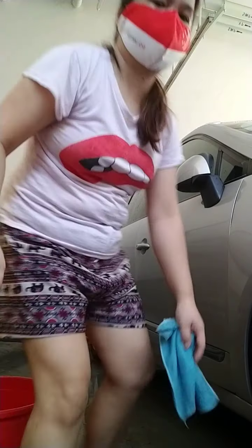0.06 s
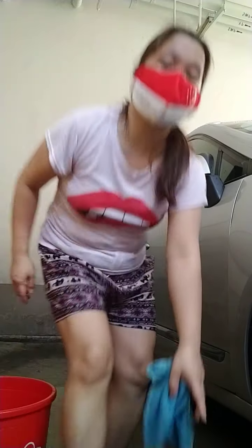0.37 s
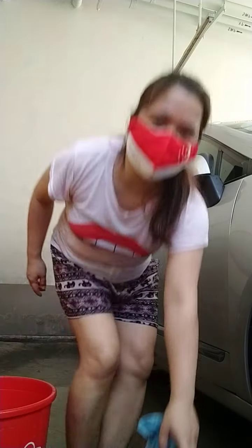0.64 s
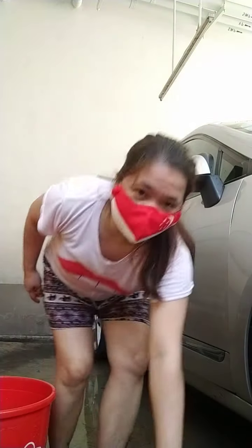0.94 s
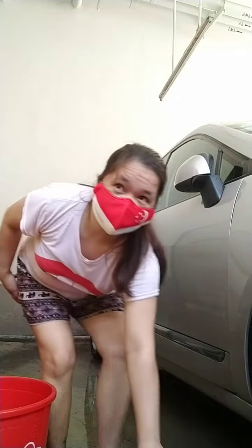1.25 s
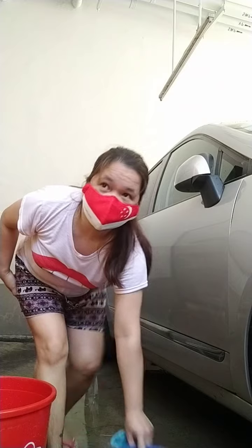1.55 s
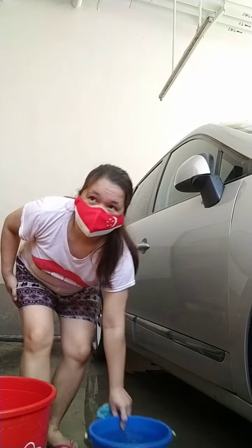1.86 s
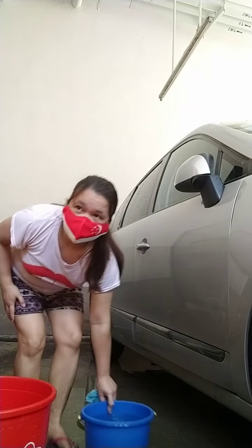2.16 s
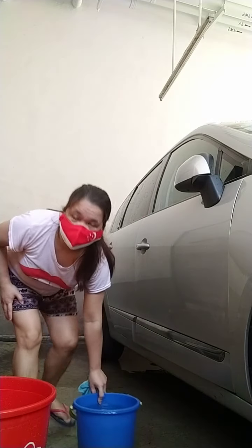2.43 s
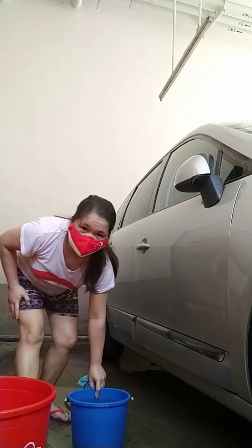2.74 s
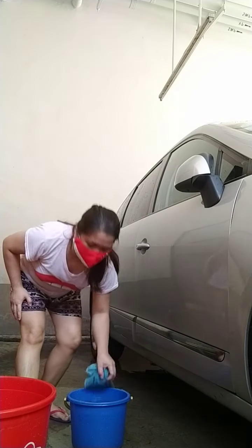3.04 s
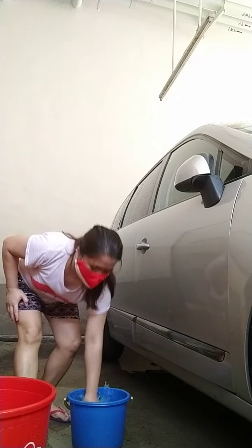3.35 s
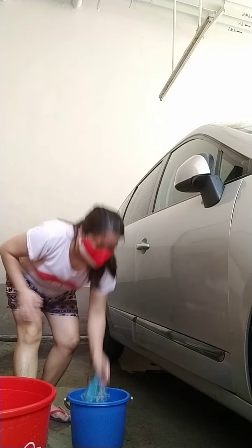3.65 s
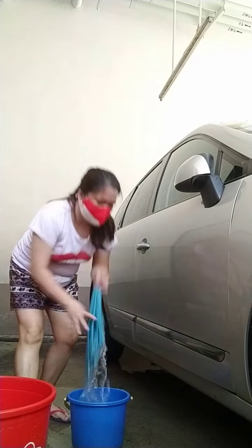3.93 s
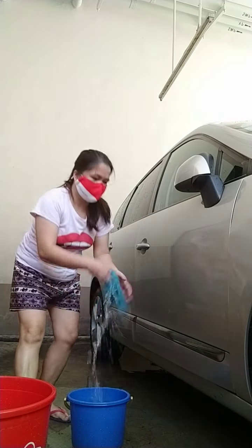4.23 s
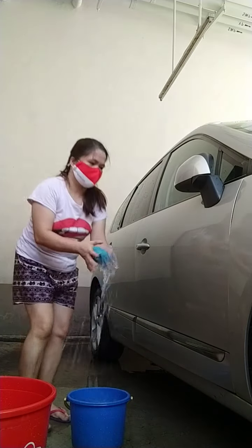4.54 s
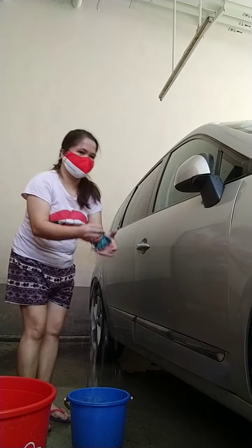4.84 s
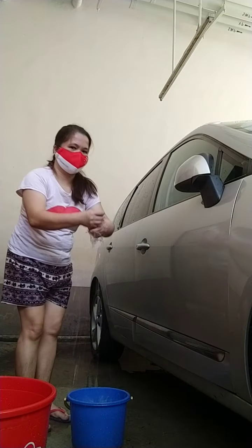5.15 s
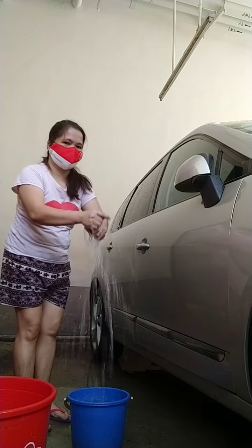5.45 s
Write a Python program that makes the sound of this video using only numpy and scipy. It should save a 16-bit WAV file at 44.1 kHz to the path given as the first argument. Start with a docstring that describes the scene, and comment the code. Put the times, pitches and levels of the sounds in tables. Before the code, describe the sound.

A thin, wide hiss, like tyres on a nearby street, swells and fades over a faint rumble, with soft low burbles of water. A sandal scuffs once. Then a wet cloth is lifted from a bucket: water plops back in, and several gushes patter, tick and slap on the concrete as it is wrung out. It is heard in mono from a few steps away in a carport.

```python
"""Wringing out a cloth in a carport

A cloth is dipped in a bucket and wrung out beside a parked car: low burbles, bubbles that plop and
ring in the bucket, then gushes that patter, tick and slap on the concrete. A sandal scuffs once.
A thin, wide hiss, probably tyres on a street nearby, swells and fades over a faint rumble.
Heard in mono from a few steps away."""
import sys
import numpy as np
from scipy import signal
from scipy.fft import rfft, irfft, next_fast_len
from scipy.io import wavfile
from scipy.ndimage import uniform_filter1d, map_coordinates

SR = 44100
rng = np.random.default_rng(int(sys.argv[2]) if len(sys.argv) > 2 else 0)


def transcribe(u):
    """Save the signal u as a 16-bit wav file named by the first command-line argument.

    u: samples, shape (n,) or (channels, n), limited to [-1, 1]; the rate is SR.
    q: integer samples, one column per channel.
    """
    v = np.clip(np.atleast_2d(u).T, -1, 1)
    q = np.round(v * 32767).astype(np.int16)
    wavfile.write(sys.argv[1], SR, q)


N = 250929
TIME = np.arange(N) / SR

HUM_TONES = [(877, -76), (1103, -76.5)]  # faint steady tones: f/Hz, level/dB
RUMBLE_EQ = [(20, -12), (40, -23), (52, -1.5), (63, 0.5), (78, -1), (90, -2.5), (101, 4), (120, -4.5),
             (160, -2.5), (210, -18.5), (400, -42)]  # distant rumble: f/Hz, level/dB
RUMBLE_THUDS = [(.31, -66), (.6, -60), (1.38, -72), (2.05, -75), (2.3, -71), (2.602, -74), (4.2, -75),
                (4.32, -73), (4.83, -78), (5.43, -72), (5.65, -63)]  # dull thuds in the rumble: t/s, level/dB
MURK_EQ = [(30, -6.5), (150, -40), (240, -4), (370, -0.5), (550, 0.5), (750, -2), (1050, -2), (1400, -0.5),
           (2500, -2), (5000, -3.5), (10000, -60)]  # dull noise bed: f/Hz, level/dB
SLOSH_EQ = [(150, -23), (400, -10), (800, 2), (1300, -2.5), (1700, -26)]  # low sloshing: f/Hz, level/dB
SLOSH_SWELLS = [(.95, -64, 0.098, 0.1), (1.85, -61.5, 0.14, 0.42), (2.66, -62, 0.13, 0.089)]  # surges of sloshing: t/s, level/dB, rise/s, fall/s

HISS_FADER = [(0, -36), (.55, -34), (.8, -37.5), (1.1, -37), (1.25, -36.5), (1.48, -34), (1.8, -38),
              (2.0, -38.5), (2.22, -42.5), (2.55, -44.5), (2.78, -47), (2.97, -43), (3.25, -48),
              (3.42, -45), (3.74, -43), (3.89, -47.5), (4.1, -43.5), (4.35, -43), (4.8, -43), (5.35, -46),
              (5.69, -40)]  # strength of the hiss: t/s, level/dB
# the hiss's steep lower edge moves; mostly fuller when loud, thinner when faint:
# t/s, edge f/Hz, level below 2.2 kHz/dB
HISS_LOW_EDGE = [(0, 1570, 3), (.4, 1510, -0.5), (.63, 1540, -2.5), (.8, 1880, -1), (.96, 1880, 0.5),
                 (1.04, 1530, -2.5), (1.17, 1530, -6.5), (1.3, 1180, -0.5), (1.55, 1040, -0.5),
                 (1.9, 1510, 1), (2.22, 1490, -1.5), (2.45, 1680, -4), (2.57, 1680, -3), (2.68, 1980, -4.5),
                 (2.82, 1900, -8), (3.0, 2830, -22), (3.25, 2040, -23), (3.6, 1840, -10.5),
                 (3.95, 1930, -14), (4.04, 2550, -33), (4.13, 2520, -26), (4.17, 1980, -5),
                 (4.52, 1850, -11.5), (4.67, 2210, -16), (4.85, 1820, -7), (5.12, 2100, -7),
                 (5.25, 1950, -10), (5.45, 2140, -10), (5.67, 1410, -8)]
HISS_BRIGHTNESS = [(0, -13.5, -17), (.42, -12.5, -16), (.75, -16.5, -21), (1.25, -17, -10.5),
                   (1.58, -20.5, -14.5), (1.8, -18, -17), (2.35, -8, -13.5), (2.55, -19, -22),
                   (2.8, -12.5, -27), (3.02, -13.5, -27), (3.25, -15.5, -26), (3.5, -16.5, -22.5),
                   (3.68, -11, -21), (3.92, -12.5, -11.5), (4.2, -8, -17.5), (5.25, -10, -6.5),
                   (5.42, -13.5, -13), (5.69, -13, -21)]  # trims on the fader: t/s, upper band/dB, sizzle/dB
BODY_EQ = [(800, -2), (1800, 1.5), (2600, 1.5), (3300, 0), (4050, -4), (4500, -14.5), (5500, -13.5),
           (7000, -84)]  # body of the hiss: f/Hz, level/dB
UPPER_EQ = [(3000, -38), (4300, 15.5), (4800, 8.5), (5600, 14.5), (6400, 10), (7200, -14.5), (9000, -82)]  # its upper band, around 5 kHz: f/Hz, level/dB
SIZZLE_EQ = [(5000, -47), (6400, -4.5), (6900, 1.5), (7700, 3), (8300, -5.5), (9000, -14), (10500, -27),
             (12500, -62), (15500, -47)]  # sizzle above 6 kHz: f/Hz, level/dB
AIR_EQ = [(5000, -6), (8000, 3), (10500, -2), (12500, -1), (15000, 2)]  # airy top: f/Hz, level/dB
HOLLOW_EQ = [(2400, 1.5), (2650, 3.5), (3050, 2.5), (3300, 0), (3600, 4.5), (4100, 2.5), (4400, -1),
             (5000, 2.5), (5500, -2), (5900, -11.5), (6250, -3.5), (6550, 3), (6900, 10), (7500, -10),
             (8300, 5)]  # hollow colour of the faint hiss: f/Hz, level/dB
FAINT_PEAKS = [(1990, 260, 10), (2590, 90, 6), (3400, 97, 4.5), (3650, 130, 5.5), (4080, 140, 6.5)]  # narrow resonances in the faint hiss: f/Hz, half width/Hz, level/dB
OPENING_PEAKS = [(2008, 240, 9.5), (3805, 450, 10), (5160, 1100, -1)]  # whistling ring as the hiss starts: f/Hz, half width/Hz, level/dB
OPENING_GLIDE = [(0, 1.0), (.34, .985), (.5, 1.075), (.9, 1.08)]  # that ring sags, then steps up: t/s, pitch ratio
# brief whistles and swishes in the hiss: t/s, half length/s, f/Hz, half width/Hz, relative level/dB
HISS_WHISTLES = [(0.38, 0.065, 1440, 29, 3), (1.093, 0.097, 2820, 73, 5.5), (1.09, 0.098, 3350, 54, 10),
                 (1.324, 0.3, 1010, 63, 4), (1.22, 0.11, 1700, 74, 2), (1.23, 0.062, 1290, 57, 7),
                 (2.1, 0.19, 930, 55, -7.5), (0.97, 0.076, 2060, 46, -3), (2.24, 0.36, 1360, 37, 3),
                 (3.55, 0.046, 1860, 110, 2.5), (3.9, 0.097, 3860, 170, 3), (2.61, 0.087, 4800, 260, -11),
                 (3.156, 0.15, 1890, 90, -4), (3.01, 0.11, 2500, 52, 6), (4.37, 0.3, 3660, 560, -4.5),
                 (0.74, 0.15, 4080, 48, -5), (8.2, 0.06, 1800, 73, -8), (4.58, 0.19, 1800, 53, -4)]
RASP_CATCHES = [(1.963, -41, 1370), (2.051, -39.5, 1470), (2.083, -39, 1410), (2.107, -34.5, 1330),
                (2.153, -42, 1335), (2.181, -37.5, 1380), (2.255, -41, 1350), (2.281, -50, 1440),
                (2.345, -48, 1370), (2.544, -50, 1340), (2.749, -46.5, 1340)]  # stutters in the hiss: t/s, level/dB, f/Hz

SANDAL_SCUFF = [(2.6, -54.5, 0.0076, 0.1)]  # a sandal on the wet floor: t/s, level/dB, rise/s, fall/s
LOUD_BURBLES = [(0.281, -43.5, 380), (0.349, -47.5, 404), (0.448, -45.5, 486), (0.563, -38.5, 690),
                (0.665, -42, 389.5), (0.721, -38.5, 433), (0.769, -40.5, 457), (0.805, -45, 386),
                (0.871, -47, 258), (0.9, -38, 823), (0.984, -45.5, 518), (1.029, -44.5, 367.5),
                (1.612, -42.5, 522), (1.69, -47, 468), (1.753, -39, 814), (1.785, -40, 697),
                (1.815, -42, 522), (1.89, -41, 780), (1.932, -44, 855), (1.971, -40.5, 665),
                (2.59, -46, 399), (2.625, -48.5, 461), (2.649, -40, 808), (3.022, -48, 788),
                (3.184, -47.5, 376), (3.315, -49, 378), (3.382, -45.5, 375), (3.721, -44.5, 403),
                (3.762, -51, 404), (3.96, -46.5, 400), (4.395, -50.5, 378), (4.519, -50, 397),
                (5.213, -47.5, 393)]  # the clearest low burbles: t/s, level/dB, f/Hz
BUCKET_PLOPS = [(4.023, -36, 662, 0.14), (4.062, -49.5, 306, 0.042), (4.072, -41, 628, 0.12),
                (4.112, -42, 620, 0.022), (4.3, -36.5, 642, 0.021), (4.315, -42, 720, 0.081),
                (4.335, -39.5, 735, 0.024), (3.43, -50, 1166, 0.034), (3.555, -48, 980, 0.043),
                (4.073, -47.5, 1385, 0.023), (4.835, -51, 1360, 0.078), (5.4, -45, 1460, 0.034)]  # water falling into the bucket: t/s, level/dB, bubble f/Hz, t60/s
CLOTH_GUSHES = [(4.19, -52.5, -60, 0.089, 0.2), (4.469, -48, -52, 0.051, 0.17),
                (4.789, -52, -50.5, 0.055, 0.08), (4.973, -45, -48.5, 0.066, .15),
                (5.23, -59.5, -51, 0.085, .08), (5.619, -42.5, -48.5, 0.095, .15)]  # water leaving the cloth: t/s, patter/dB, sizzle/dB, rise/s, fall/s
PATTER_EQ = [(1000, -34), (1600, -14), (2200, 4), (2800, 0), (3400, 5), (4150, 7), (4800, 3.5), (7600, 5),
             (8800, -14), (10500, -19), (15000, -30)]  # spray on concrete: f/Hz, level/dB
LOUD_DROPS = [(3.883, -40, 5250), (4.025, -40.5, 6340), (4.355, -42, 8000), (4.464, -42, 7560),
              (4.5486, -34.5, 7300), (4.6477, -31, 6170), (4.742, -34, 6450), (4.767, -36, 5120),
              (4.916, -38, 6700), (4.937, -36, 7000), (4.955, -33, 6400), (4.972, -35, 7200),
              (5.051, -36, 6900), (5.207, -42, 6900), (5.235, -41, 7200), (5.523, -42, 7100)]  # single drops on concrete: t/s, level/dB, f/Hz
FINE_SPITS = [(4.495, -50), (4.556, -52), (4.707, -49), (4.73, -51), (5.2358, -47), (5.391, -49),
              (5.433, -55), (5.594, -49), (5.6524, -44)]  # fine droplets bursting, thin and very bright: t/s, level/dB
WET_SLAPS = [(4.441, -26, 3750, 0.025), (4.772, -29.5, 2640, 0.025), (4.837, -37.5, 1840, 0.059),
             (4.954, -36, 2960, 0.016), (5.084, -31, 3100, 0.011), (5.182, -29, 2700, 0.037),
             (5.6517, -23, 1825, 0.012), (5.6532, -20, 2220, 0.022), (5.668, -29.5, 1730, 0.12)]  # heavy slaps, the hardest a double smack: t/s, level/dB, f/Hz, t60/s


def amp(db):
    """Decibels to gain."""
    return 10 ** (np.asarray(db) / 20)


def unit(x):
    """Scale to rms 1."""
    return x / np.sqrt(np.mean(x ** 2) + 1e-20)


def eq(points, hz):
    """Gain of an EQ curve, read on a log frequency axis."""
    f, db = np.transpose(points)
    return amp(np.interp(np.log(hz + 1), np.log(f + 1), db))


def peaks_db(rows, hz):
    """Summed dB of bell-shaped resonances."""
    return sum(db * np.exp(-((hz - centre) / width) ** 2) for centre, width, db in rows)


def curves(rows, t=TIME):
    """Automation: each column after the first, read at the times t."""
    times, *columns = np.transpose(rows)
    return [np.interp(t, times, column) for column in columns]


def swells(rows):
    """Gain of overlapping swells, summed in power."""
    gains = (amp(db) * np.exp(-((TIME - s) / np.where(TIME < s, rise, fall)) ** 2)
             for s, db, rise, fall in rows)
    return np.sqrt(sum(gain ** 2 for gain in gains))


def add(track, s, sound):
    """Mix a sound into a track at s seconds."""
    part = track[max(round(s * SR), 0):][:len(sound)]
    part += sound[:len(part)]


def filtered(x, response):
    """Filter x by a gain that is a function of frequency."""
    size = next_fast_len(N + SR // 2)
    return irfft(rfft(x, size) * response(np.fft.rfftfreq(size, 1 / SR)), size)[:N]


def smooth_noise(points):
    """Steady noise of rms 1 through an EQ curve."""
    return unit(filtered(rng.standard_normal(N), lambda hz: eq(points, hz)))


def patches(shape):
    """A random field over frequency and time, in long narrow patches."""
    field = rng.standard_normal(shape)
    for size, axis in (3, 0), (16, 1), (5, 1):
        field = uniform_filter1d(field, size, axis)
    return np.minimum(unit(field), 1.3)


def swirling_noise(depth_db, size=1024):
    """Patchy noise at constant power: frequencies, frame times and short-time spectrum."""
    hz, t, bins = signal.stft(rng.standard_normal(N), SR, nperseg=size, noverlap=size * 3 // 4)
    gain = amp(np.interp(t, TIME, depth_db) * patches(bins.shape))
    return hz[:, None], t, bins * gain / np.sqrt(np.mean(gain ** 2, axis=0))


def waveform(bins, size=1024):
    """Turn a short-time spectrum into sound."""
    return signal.istft(bins, nperseg=size, noverlap=size * 3 // 4)[1][:N]


def wandering(hz, t, share=0.02, per_s=7, span_hz=900):
    """A drifting frequency axis: each resonance read on it moves in its own way."""
    knots = rng.standard_normal((int(SR / span_hz), int(N * per_s / SR) + 4))
    drift = map_coordinates(knots, np.broadcast_arrays(hz / span_hz, t * per_s), mode="nearest")
    return hz * (1 + share * drift)


def background():
    """Faint hum, a distant rumble that thuds and rides the hiss fader, low sloshing and a dull bed."""
    hum = sum(amp(db) * np.sqrt(2) * np.sin(2 * np.pi * hz * TIME + rng.uniform(0, 2 * np.pi))
              for hz, db in HUM_TONES)
    thuds = swells([(s, db, 0.066, 0.11) for s, db in RUMBLE_THUDS])
    ride_db = curves(HISS_FADER)[0] + 34.5  # about 0 with the hiss at its loudest
    rumble = np.hypot(amp(-69.5 + 1.2 * ride_db), thuds) * smooth_noise(RUMBLE_EQ)
    hz, _, noise = swirling_noise(np.full(N, 6.0), size=512)
    slosh = unit(waveform(noise * eq(SLOSH_EQ, hz), size=512))
    slosh *= np.hypot(amp(-69.5), swells(SLOSH_SWELLS))
    return hum + rumble + slosh + amp(-62.5) * smooth_noise(MURK_EQ)


def hiss_resonances(hz, t, faint):
    """Gain of a ring that opens the hiss and a drifting hollowness that grows as it gets faint."""
    drifting_hz = wandering(hz, t)
    narrow_fade = np.clip((3.9 - t) / 0.3, 0, 1)  # gone by 3.9 s
    hollow = eq(HOLLOW_EQ, drifting_hz) * amp(narrow_fade * peaks_db(FAINT_PEAKS, drifting_hz))
    ring_fade = np.clip(1 - (t - 0.7) / 0.25, 0, 1)  # holds 0.7 s, then lets go
    ring = amp(ring_fade * peaks_db(OPENING_PEAKS, hz / curves(OPENING_GLIDE, t)[0]))
    return hollow ** faint * ring


def tyre_hiss():
    """Hiss with a steep, moving lower edge: mostly fuller when loud, a hollow swirl when faint."""
    fader_db, = curves(HISS_FADER)
    faint = np.clip((-36 - fader_db) / 10, 0, 1)  # 0 loud, 1 faint
    swirl_db = np.interp(faint, [0, 1], [2.3, 6.5])
    hz, t, noise = swirling_noise(0.73 * swirl_db)
    frame_faint = np.interp(t, TIME, faint)
    resonances = hiss_resonances(hz, t, frame_faint)
    whistles = sum(amp(db) * np.exp(-((t - s) / length) ** 2 - ((hz - pitch) / width) ** 2)
                   for s, length, pitch, width, db in HISS_WHISTLES)
    edge_hz, fullness_db = curves(HISS_LOW_EDGE, t)
    fray = 0.13 * np.interp(frame_faint, [0, 1], [0.96, 1])  # the lower edge breaks into wisps
    frayed_hz = edge_hz * np.exp(-fray * patches(noise.shape))
    low_cut = 1 / np.sqrt(1 + (frayed_hz / np.maximum(hz, 100)) ** 30)
    low_shelf = amp(fullness_db / (1 + (hz / 2200) ** 8))
    core = (hz > 2400) & (hz < 4300)  # this band anchors the body's level
    colour = eq(BODY_EQ, hz) * resonances
    colour /= np.sqrt(np.mean(colour[core[:, 0]] ** 2, axis=0))
    body = waveform(noise * (colour * low_cut * low_shelf + whistles))
    body /= np.std(waveform(noise * colour * core))
    upper = unit(waveform(swirling_noise(swirl_db)[2] * resonances * eq(UPPER_EQ, hz)))
    return amp(fader_db) * (body + amp(curves(HISS_BRIGHTNESS)[0] + 3) * upper)


def gurgle(db, hz, width_hz, rise_s):
    """A short swell of narrow noise, trailed by a rougher, broader skirt."""
    t = np.arange(SR // 5) / SR

    def cluster(spread_hz, peak_s):
        cycles = rng.normal(hz, spread_hz, (24, 1)) * t + rng.random((24, 1))
        return t / peak_s * np.exp(1 - t / peak_s) * np.sin(2 * np.pi * cycles).sum(0)

    sound = cluster(width_hz, rise_s) + amp(-8) * cluster(150, 1.5 * rise_s)
    return amp(db) * sound / np.abs(sound).max()


def rasp(trim_db=-2):
    """The hiss stutters in quick, uneven catches around one pitch, dying away."""
    out = np.zeros(N)
    for s, db, hz in RASP_CATCHES:
        add(out, s, gurgle(db + trim_db, hz, width_hz=55.3, rise_s=0.0073))
    return out


def gush_sizzle():
    """Gain of the fine spray as the cloth is lifted and wrung."""
    return swells([(s, db, rise, fall) for s, _, db, rise, fall in CLOTH_GUSHES])


def splatter(per_s=170, t60=0.022, spread_db=3, steady=0.15):
    """A gain of rms 1 that jumps at every landing drop and falls away at once."""
    drops = (rng.random(N) < per_s / SR) * amp(spread_db * np.clip(rng.standard_normal(N), -2, 2))
    power = signal.lfilter([1], [1, -amp(-60 / (t60 * SR)) ** 2], drops ** 2)
    return np.sqrt(steady + (1 - steady) * power / power.mean())


def sizzle_and_air():
    """Top end of the hiss, the gushes and the sandal scuff; hollower and more swirling when faint."""
    gush = gush_sizzle()
    wet = gush * splatter() + swells(SANDAL_SCUFF)
    fizz = amp(curves(HISS_FADER)[0] + curves(HISS_BRIGHTNESS)[1])
    faint = np.interp(20 * np.log10(np.hypot(fizz, gush)), [-60, -48], [1, 0])
    hz, t, noise = swirling_noise(depth_db=3.5 + 6.5 * faint)
    hollow = eq(HOLLOW_EQ, wandering(hz, t)) ** (0.77 * np.interp(t, TIME, faint))
    sizzle = amp(0.5) * np.hypot(fizz, wet) * unit(waveform(noise * hollow * eq(SIZZLE_EQ, hz)))
    air_gain = np.sqrt(amp(-79.5) ** 2 + (amp(-19.5) * fizz) ** 2 + (amp(-17) * wet) ** 2)
    return sizzle + air_gain * smooth_noise(AIR_EQ)


def burbles(faint_count=14, trim_db=-7.5):
    """Soft, low burbles, with fainter ones scattered at loose intervals."""
    out = np.zeros(N)
    faint = [((k + rng.random()) / faint_count * N / SR, rng.normal(-54, 2),
              420 * 2 ** rng.normal(0, 0.222)) for k in range(faint_count)]
    for s, db, hz in LOUD_BURBLES + faint:
        add(out, s - 0.007, gurgle(db + trim_db, hz, width_hz=32, rise_s=0.015))
    return out


def impact(db, hz, t60, width, crack_db):
    """A tiny hit: a noise burst in a broad resonance, with a fine crack on top."""
    t = np.arange(SR // 20) / SR
    burst = rng.standard_normal(len(t)) * amp(-60 * t / t60)
    band_hz = [hz / (1 + width), hz * (1 + width)]
    ring = signal.sosfilt(signal.butter(5, band_hz, "band", fs=SR, output="sos"), burst)
    sound = ring + amp(crack_db) * burst
    return amp(db) * sound / np.abs(sound).max()


def tick():
    """One light, bright snap before the water starts."""
    out = np.zeros(N)
    add(out, 0.1506, impact(db=-29.5, hz=7820, t60=0.045, width=0.13, crack_db=-23))
    return out


def bucket_ring(bubbles, centre_hz=656, width_hz=113, t60=0.6):
    """The bucket and its rocking water ring on unsteadily after each plop."""
    t = np.arange(SR // 2) / SR
    power = np.abs(signal.fftconvolve(bubbles ** 2, amp(-60 * t / t60) ** 2)[:N])
    ring = unit(filtered(rng.standard_normal(N), lambda hz: np.exp(-((hz - centre_hz) / width_hz) ** 2)))
    return amp(-10) * np.std(bubbles) * unit(np.sqrt(power)) * ring


def plops(attack_s=0.007, glide=0.25, trim_db=-3):
    """Trapped bubbles ring in the bucket, rising a little in pitch."""
    out, t = np.zeros(N), np.arange(SR // 5) / SR
    for s, db, hz, t60 in BUCKET_PLOPS:
        envelope = amp(-60 * t / t60) * (1 - np.exp(-(t / attack_s) ** 2))
        tone = np.sin(2 * np.pi * hz * t * (1 + glide * t))
        add(out, s, amp(db + trim_db) * envelope / envelope.max() * tone)
    return out + bucket_ring(out)


def patter(per_s=300, spread_db=0.5, t60=0.025, burst_samples=90):
    """Each gush lands as countless droplets of uneven size, each a tiny noise burst."""
    count, k = int(per_s * N / SR), np.arange(burst_samples)
    starts = rng.integers(0, N, (count, 1))
    sizes = amp(spread_db * np.minimum(rng.exponential(size=(count, 1)), 2.6))
    bursts = sizes * rng.standard_normal((count, burst_samples)) * amp(-60 * k / SR / t60)
    spray = np.bincount((starts + k).ravel(), bursts.ravel(), N)[:N]
    gush = swells([(s, db, rise, fall) for s, db, _, rise, fall in CLOTH_GUSHES])
    return gush * unit(filtered(spray, lambda hz: eq(PATTER_EQ, hz)))


def splashes(stray_count=36):
    """Drops tick and spit brightly on the concrete; gobs of water slap lower and broader."""
    out = np.zeros(N)
    fallen = np.cumsum(gush_sizzle() ** 4)  # strays crowd where the spray is thickest
    shares = (np.arange(stray_count) + rng.random(stray_count)) / stray_count
    stray_times = np.searchsorted(fallen, fallen[-1] * shares) / SR
    strays = [(s, -42.5, rng.normal(6550, 770)) for s in stray_times]
    for s, db, hz in LOUD_DROPS + strays:
        add(out, s, impact(db + 1, hz, t60=0.03, width=0.2, crack_db=-31))
    for s, db in FINE_SPITS:
        add(out, s, impact(db, hz=12500, t60=0.03, width=0.3, crack_db=-12))
    for s, db, hz, t60 in WET_SLAPS:
        add(out, s, impact(db, hz, t60, width=0.35, crack_db=-42))
    return out


def carport(x, t60=0.3):
    """Short reverb: the wall and the car answer briefly."""
    t = np.arange(SR // 3) / SR
    tail = rng.standard_normal(len(t)) * amp(-60 * t / t60) * (t > 0.005)
    return signal.fftconvolve(x, tail / np.linalg.norm(tail))[:N]


def scene():
    """Water up front with a little reverb, hiss and background around it; both channels alike."""
    close = patter() + splashes() + plops() + tick()
    around = tyre_hiss() + sizzle_and_air() + rasp() + burbles() + background()
    mono = close + amp(-10) * carport(close) + around
    return np.array([mono, mono])


def record(dry, top_hz=15600):
    """Brick-wall low-pass on the mix."""
    return np.array([filtered(channel, lambda hz: hz < top_hz) for channel in dry])


dry = scene()
out = record(dry)
transcribe(out)
```